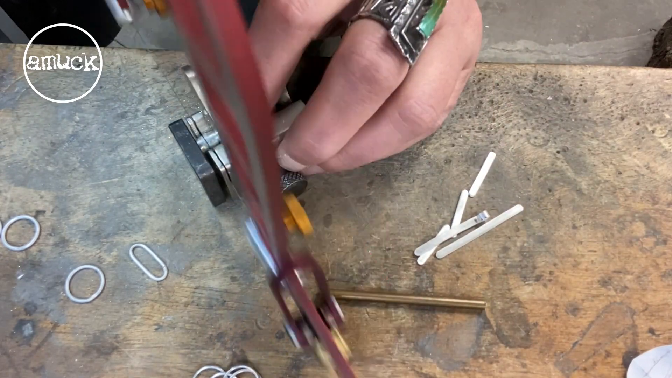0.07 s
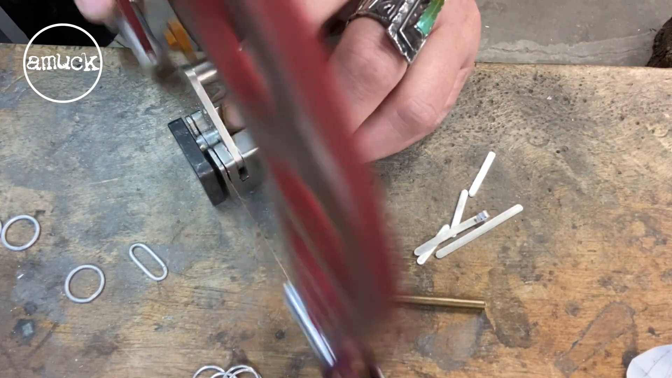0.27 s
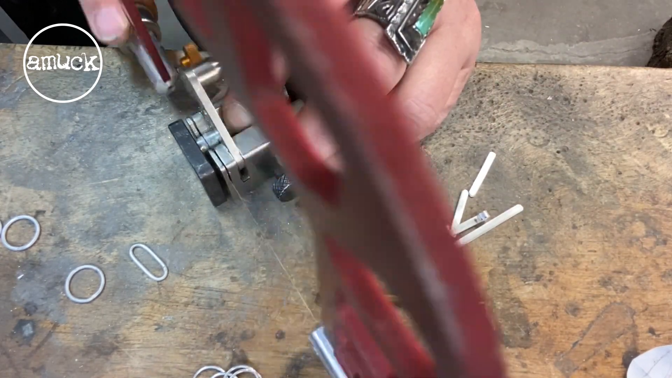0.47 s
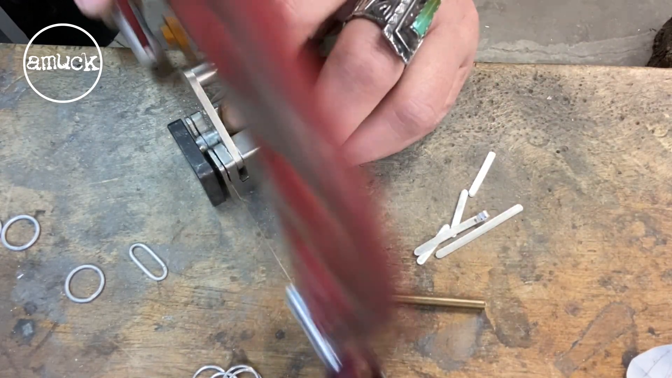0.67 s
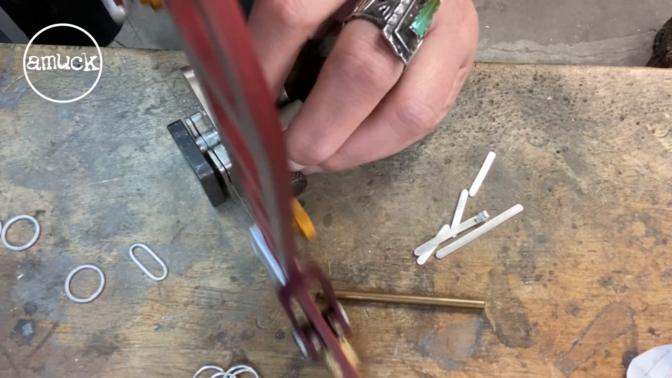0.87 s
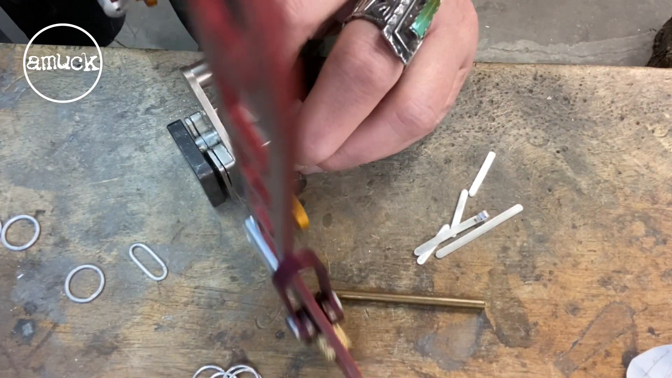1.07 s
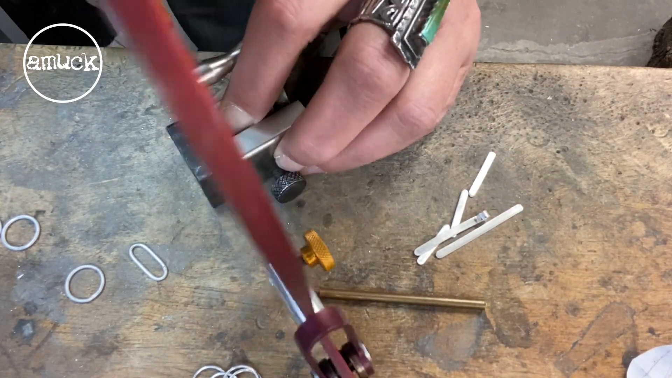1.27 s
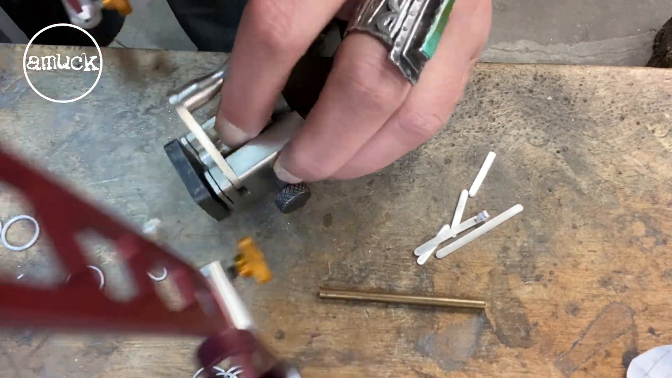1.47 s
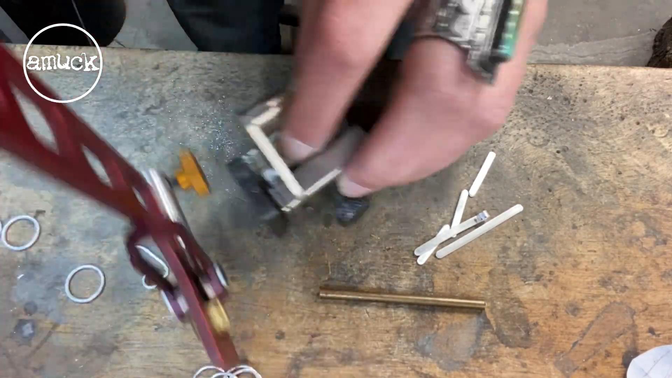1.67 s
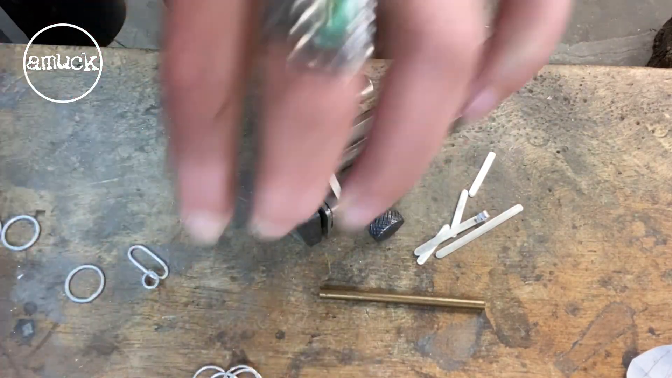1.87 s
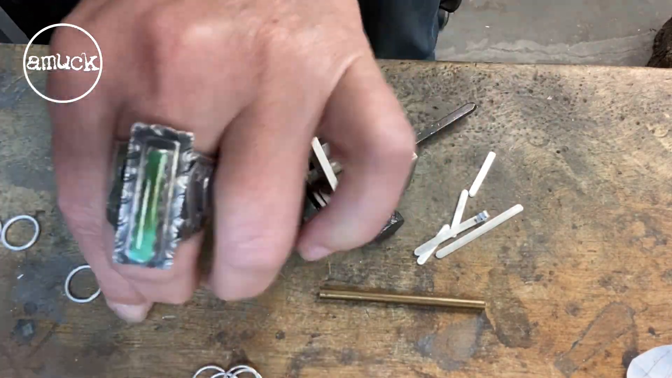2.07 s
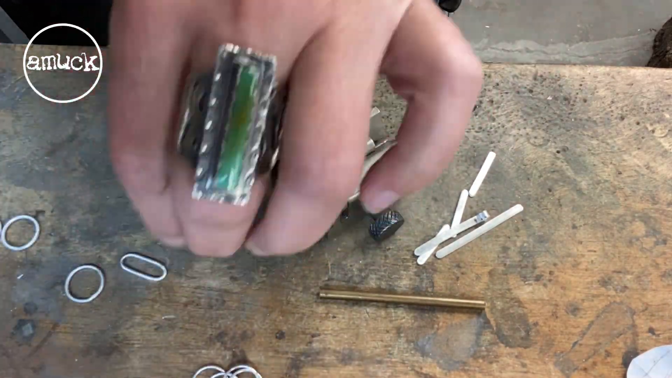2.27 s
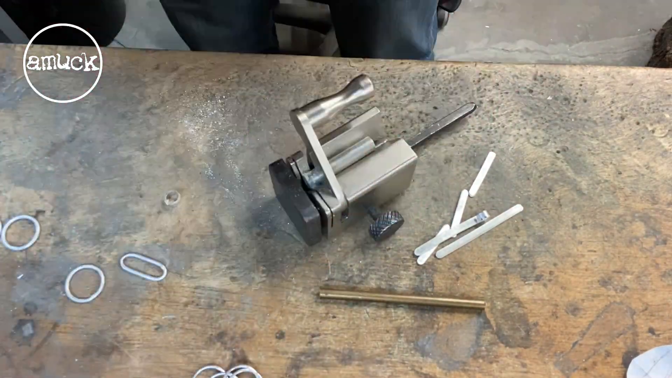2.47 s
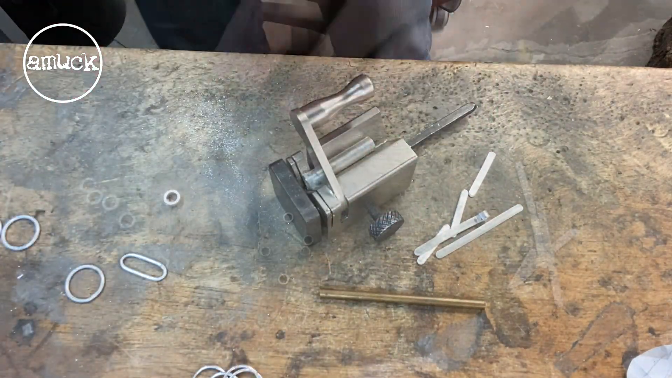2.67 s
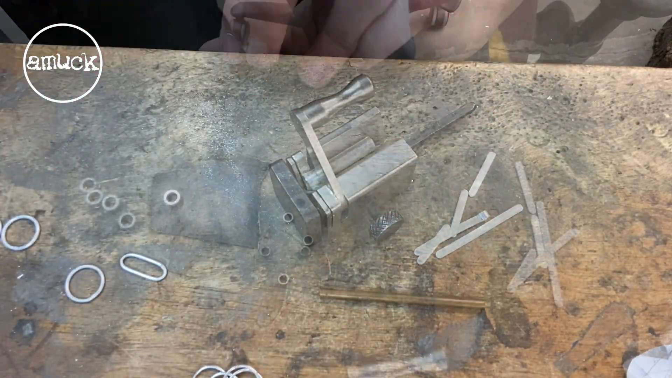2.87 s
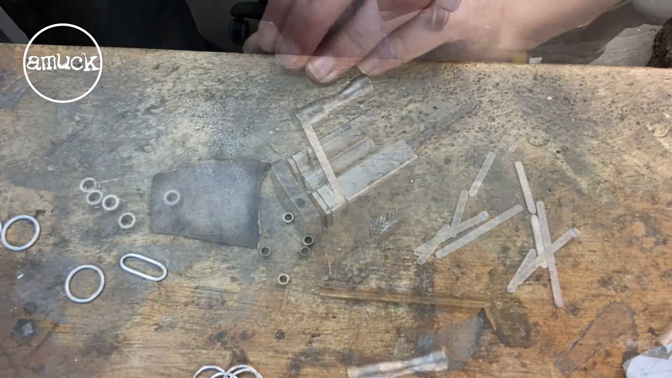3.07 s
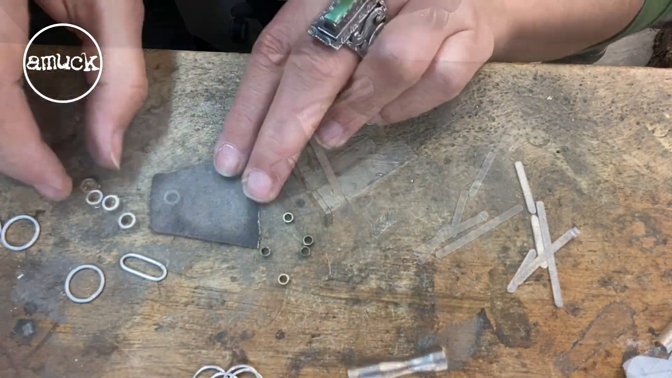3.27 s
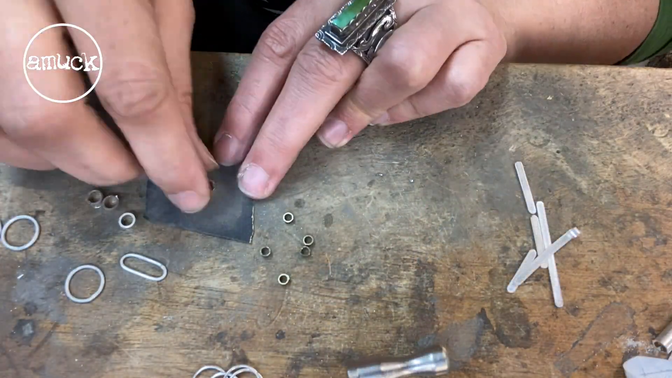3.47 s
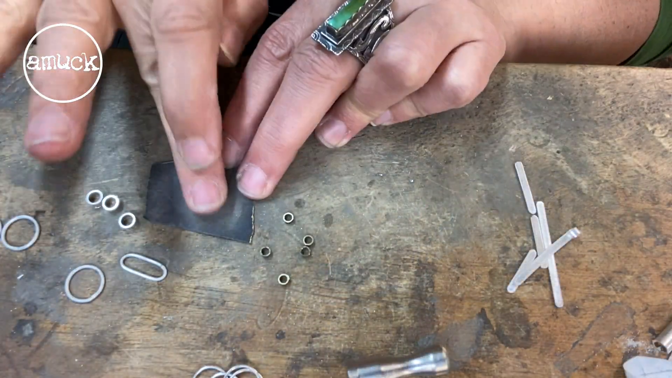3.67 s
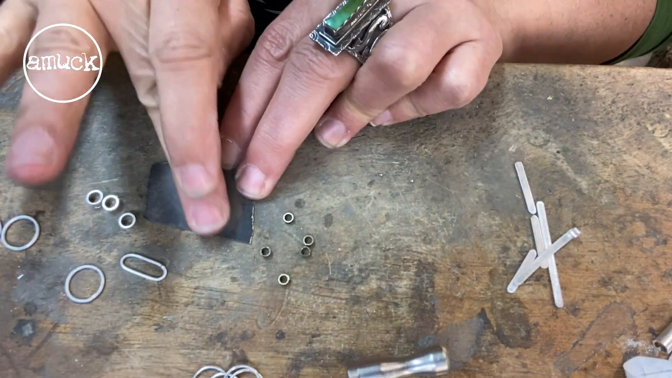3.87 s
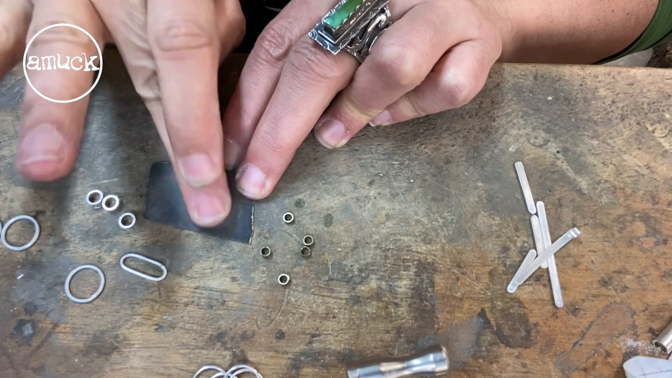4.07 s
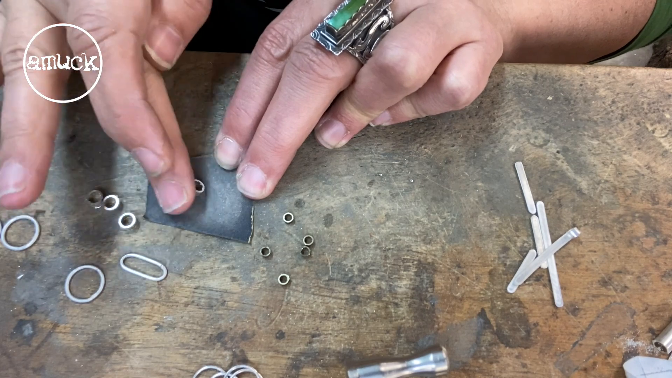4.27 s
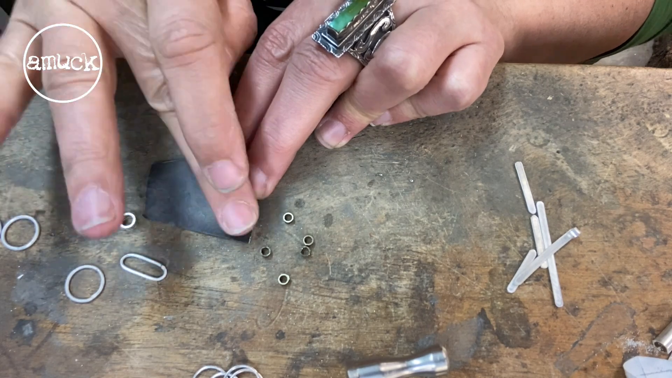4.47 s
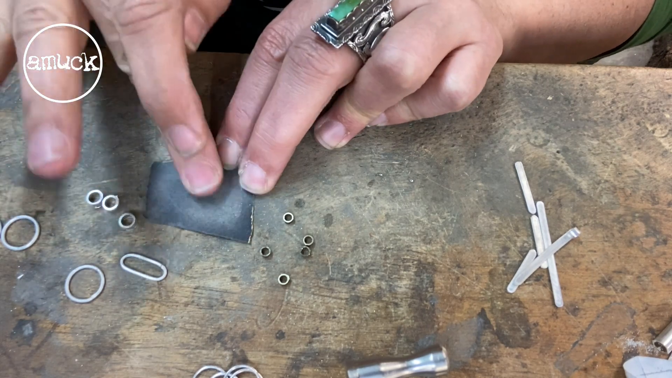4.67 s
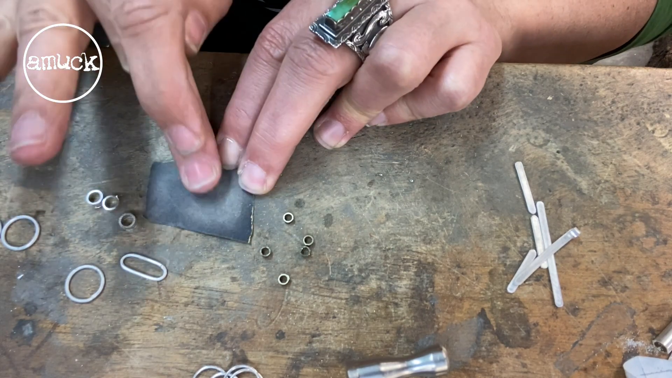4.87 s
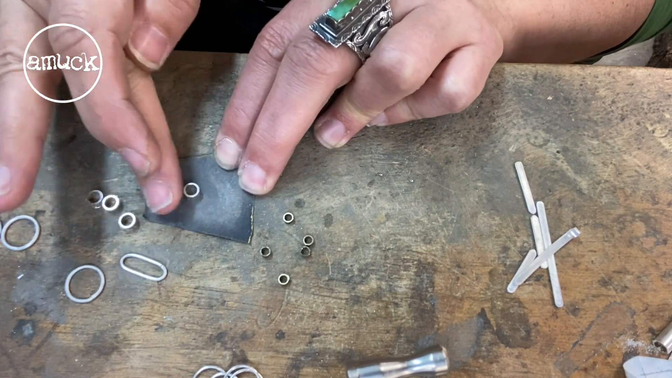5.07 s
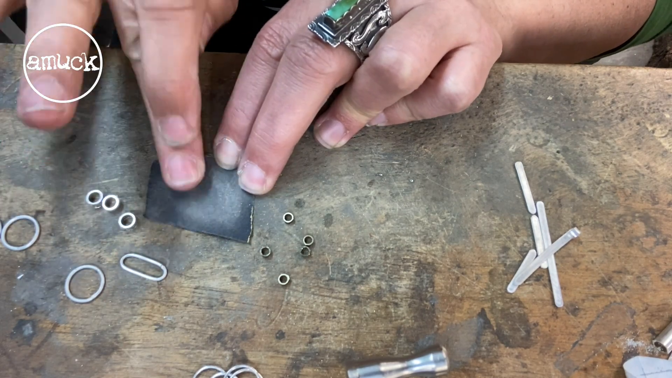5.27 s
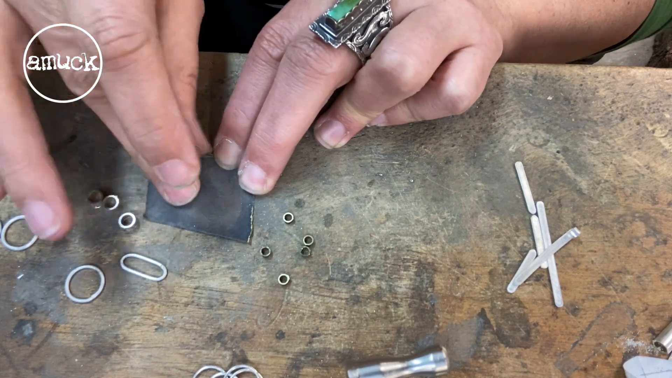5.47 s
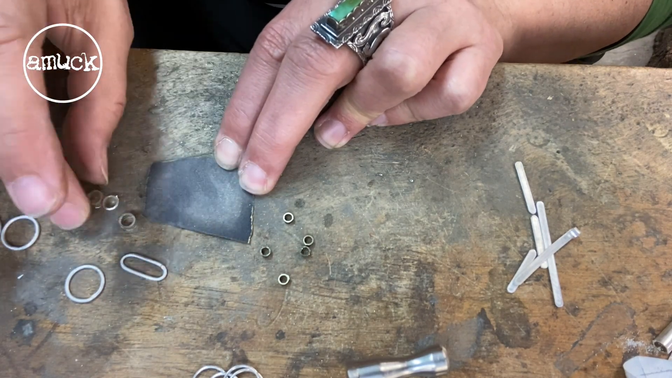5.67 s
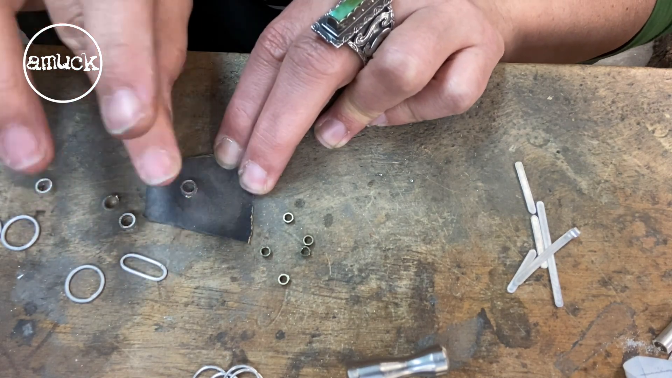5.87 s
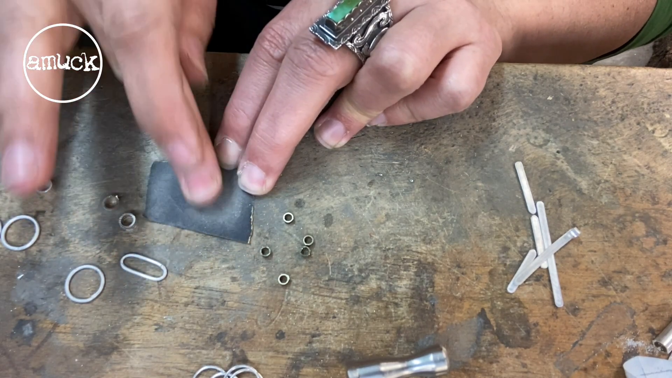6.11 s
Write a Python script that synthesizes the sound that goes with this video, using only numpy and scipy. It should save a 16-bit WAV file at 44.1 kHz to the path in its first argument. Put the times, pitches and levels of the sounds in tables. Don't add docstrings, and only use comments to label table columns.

```python
import sys
import numpy as np
from scipy import signal
from scipy.fft import rfft, irfft, next_fast_len
from scipy.io import wavfile
from scipy.ndimage import map_coordinates

SR = 44100
rng = np.random.default_rng(int(sys.argv[2]) if len(sys.argv) > 2 else 0)


def dump_mix(stems):
    frames = np.atleast_2d(stems).T
    limited = np.clip(frames, -1, 1)
    pcm = np.round(limited * 32767).astype(np.int16)
    wavfile.write(sys.argv[1], SR, pcm)


def decibels_to_gain(level_db):
    exponent = np.asarray(level_db, float) / 20
    return 10 ** exponent


N = 270774
T = np.arange(N) / SR

# centre in [Hz], width in [Hz], level in [dB].
BENCH = [(246, 150, -4.5), (535, 34, 1), (800, 51, -3), (1170, 160, -4.5), (1420, 120, -4.5)]
KNOCK = [(990.6, 220, 2.5), (1330, 250, 2.5), (2000, 640, 9), (3010, 66, -5.5), (4100, 600, -16.5)]
TICK = [(4900, 1100, 1), (5710, 1000, 0), (7530, 530, 2.5), (9900, 760, -8)]
EDGE = [(11720, 6000, 4), (12120, 2200, 0), (16300, 6200, -6.5)]


def unit(x):
    return x / np.sqrt(np.mean(x ** 2) + 1e-20)


def along(points, hz):
    f, v = np.transpose(points)
    return np.interp(np.log(hz + 1), np.log(f + 1), v)


def wobble(rate, size=None):
    knots = rng.standard_normal(int(N * rate / SR) + 4)
    return map_coordinates(knots, [T[:size] * rate])


def filtered(x, response):
    m = next_fast_len(x.shape[-1] + SR // 2)
    spectrum = rfft(x, m) * response(np.fft.rfftfreq(m, 1 / SR))
    return irfft(spectrum, m)[..., :x.shape[-1]]


def early(x, response):
    busy = 3 * SR
    return np.pad(filtered(x[:busy], response), (0, N - busy))


def highpass(corner_hz, order):
    return lambda f: (1j * f / (corner_hz + 1j * f)) ** order


def body(modes, sign=-1):
    grid = np.linspace(0, SR / 2, 8192)
    ring = 0
    for k, (hz, width, db) in enumerate(modes):
        ring = ring + sign ** k * decibels_to_gain(db) * 1j * grid * width / (hz * hz - grid * grid + 1j * grid * width)
    ring = ring / (1 + 1j * grid / (1.4 * modes[-1][0])) ** 3
    ring = ring / np.sqrt(np.mean(abs(ring) ** 2))
    return lambda f: np.interp(f, grid, ring)


def grains(spread_db):
    return unit(rng.standard_normal(N) * decibels_to_gain(spread_db * rng.standard_normal(N)))


def returning(modes, change_db):
    back = [(hz, width, db + change) for (hz, width, db), change in zip(modes, change_db)]
    return modes, back


def saw():
    # start in [s], rasp in [dB], top tooth rate in [Hz],
    # tooth tone in [dB], lateness of top speed [exponent].
    strokes = [(-.04, -48.5, 2000, -54, 0.86), (.042, -44.5, 2304, -57.5, 0.89),
               (0.127, -44, 2235, -41, 0.98), (0.215, -44.5, 2120, -50.5, .9),
               (0.296, -44.5, 2192, -48, 0.98), (.379, -42, 2105, -55, 0.94),
               (.464, -43.5, 2204, -44, 0.99), (.548, -41, 2000, -49.5, 0.93),
               (.632, -42.5, 2112, -43, 0.96), (.727, -41.5, 2209, -54, 0.74),
               (.803, -42.5, 2176, -43, .95), (.885, -41, 2108, -48, 1.04), (0.97, -44, 2000, -49.5, 0.53)]
    # time in [s], flare in [dB].
    flares = [(0.089, 17), (0.137, 16), (.157, 10), (0.19, 5), (.226, 6), (.275, 1), (0.307, 21),
              (.356, 3), (0.389, 9), (.445, 8), (0.48, 13), (.525, 5), (.575, 4), (0.694, 0), (0.74, 11),
              (.812, 19), (.846, 4), (0.9, 6), (.924, 11)]
    # centre in [Hz], width in [Hz], level in [dB].
    jig_modes = [(490, 23, -5.5), (735, 63, -1), (1383, 78, -4), (1550, 39, -3.5), (2060, 99, -4.5),
                 (2571, 160, 0.5), (3630, 170, -6.5), (3796, 88, -6.5)]
    blade_modes = [(4870, 150, -14.5), (5400, 160, -3.5), (5977, 90, -7), (6413, 58, -1), (7310, 160, -0.5),
                   (8200, 400, -13.5), (9300, 150, -11), (10300, 600, -15.5), (11100, 258, -11),
                   (11600, 200, -11), (13200, 70, -8.5), (14200, 77, -1), (14634, 150, -13.5),
                   (15300, 200, -1)]
    jig_return_db = [-3, -2, -3.5, 0.5, -0.5, 2.5, 1.5, -1]
    blade_return_db = [-1, 2.5, -0.5, 2.5, -2.5, -0.5, -1.5, -0.5, -0.5, 0, -4, -0.5, -1, 4.5]
    # frequency in [Hz], level in [dB].
    between = [(60, -34), (150, -23), (300, -16), (1000, -19.5), (3950, -21.5), (4200, -32.5), (9000, -34),
               (16000, -40)]
    overtones_db = [-2, -14]

    s, rasp_db, top_hz, tooth_db, late = np.transpose(strokes)
    last_stroke_s, dwell_s = .064, .001
    length = np.append(np.diff(s), last_stroke_s) - dwell_s
    k = np.clip(np.searchsorted(s, T) - 1, 0, None)
    back = k % 2
    ways = (1 - back, back)

    u = np.clip((T - s[k]) / length[k], 0, 1) ** late[k]
    speed = np.sin(np.pi * u) * (T < 1.002)
    grip = np.where(u < .5, .45, .5)
    bite = np.clip(speed / grip, 0, 1) ** 2.2 * (.75 + .25 * speed)

    pace = np.sin(np.pi * np.clip(u + .06, 0, 1)).clip(0) ** .9
    phase = 2 * np.pi * np.cumsum(top_hz[k] * pace * (1 + .015 * wobble(300))) / SR
    second = decibels_to_gain(overtones_db[0] - 5.8 * speed ** 6) * np.sin(2 * phase)
    third = decibels_to_gain(overtones_db[1]) * np.sin(3 * phase)
    teeth = (np.sin(phase) + second + third) * decibels_to_gain(6 * (u - 1.0))

    flare_s = .004
    flare_db = sum(db * np.exp(-((T[:SR] - at) / flare_s) ** 2) for at, db in flares)
    flare_db = np.pad(flare_db, (0, N - SR))
    snag = decibels_to_gain(1.3 * wobble(109.34) - 2.0 + .45 * flare_db)
    gate = 1 + .6 * np.cos(phase)

    def wood(part, open_db):
        ring = body(part)
        return lambda f: ring(f) + decibels_to_gain(along(between, f) + open_db)

    tone_level = decibels_to_gain(tooth_db[k] + 2 * wobble(120) + .55 * flare_db) / 1.15
    out = early(bite * speed * tone_level * teeth, wood(jig_modes, 19))

    chips = bite * decibels_to_gain(rasp_db[k]) * snag * gate * grains(2)
    for way, part in zip(ways, returning(jig_modes, jig_return_db)):
        out = out + early(way * chips, wood(part, 12))

    clicks = sum(np.sin(h * phase) for h in range(3, 8))
    hiss = gate * grains(2) + .17 * decibels_to_gain(4.5 * wobble(80)) * clicks
    hiss = hiss * bite * speed ** .5 * snag ** .5 * decibels_to_gain(-55.5 + 3 * back)
    for half in (0, 1):
        for way, part in zip(ways, returning(blade_modes, blade_return_db)):
            out = out + early(way * hiss * decibels_to_gain(2.7 * wobble(35) - 2.5), body(part[half::2]))

    glide = 2 * np.pi * np.cumsum(-300 + 8000 * u + 120 * wobble(400)) / SR
    squeak = np.exp(-((u - .76) / .05) ** 2) * decibels_to_gain(-64 + 3 * wobble(60)) * (np.sin(glide) + np.sin(2 * glide))
    turn = 2 * np.pi * np.cumsum(2400 + 5800 * u) / SR
    chirp = np.exp(-((u - .97) / .05) ** 2) * decibels_to_gain(-63) * np.sin(turn) * (T < .9)
    return out + back * (squeak + chirp)


def slide(rows, rise, fall, bodies, sag_db=0):
    gains = np.zeros((len(bodies), N))
    for s, length, db, *rel_db in rows:
        i = slice(round(s * SR), round((s + length + .06) * SR))
        t = T[i] - s
        attack = 1 - np.exp(-(t + 0.00091) / rise)
        release = np.exp(-np.clip(t - 0.77 * length, 0, None) / fall)
        shape = attack * release * decibels_to_gain(sag_db * (.5 - t / length))
        gains[:, i] += decibels_to_gain(db + np.array([0, *rel_db]))[:, None] * shape
    rough = decibels_to_gain(0.56 * wobble(250))
    out = 0
    for gain, modes in zip(gains, bodies):
        out = out + filtered(gain * rough * decibels_to_gain(2.1 * wobble(300)) * grains(5.5), body(modes))
    return out


def rubs():
    # start in [s], length in [s], grit in [dB].
    first_ring = [(3.642, 0.012, -55), (3.678, 0.027, -47), (3.721, 0.019, -50.5), (3.753, 0.015, -46),
                  (3.789, 0.015, -44.5), (3.815, 0.02, -45), (3.846, 0.02, -47.5), (3.876, 0.024, -48),
                  (3.905, 0.026, -47.5), (3.939, 0.027, -48), (3.971, 0.021, -46.5), (4.003, 0.019, -46.5),
                  (4.032, 0.023, -46.5), (4.064, 0.026, -50), (4.098, 0.024, -47), (4.131, 0.023, -50.5),
                  (4.159, 0.022, -51), (4.195, 0.023, -54.5)]
    second_ring = [(4.663, 0.041, -55), (4.707, 0.029, -44), (4.746, 0.022, -50), (4.776, 0.023, -48.5),
                   (4.806, 0.022, -50), (4.838, 0.024, -49), (4.869, 0.0185, -50.5), (4.898, 0.019, -51.5),
                   (4.924, 0.03, -55), (4.959, 0.02, -59.5)]
    third_ring = [(5.197, 0.024, -56), (5.234, 0.021, -50), (5.265, 0.027, -49.5), (5.297, 0.02, -48),
                  (5.326, 0.018, -49.5), (5.356, 0.018, -50.5), (5.381, 0.014, -51), (5.406, 0.015, -51),
                  (5.429, 0.021, -54.5)]
    fourth_ring = [(5.98, 0.029, -51), (6.021, 0.021, -46.5), (6.059, 0.017, -47.5), (6.089, 0.019, -42),
                   (6.12, 0.016, -42)]
    # push chatter, push bench, pull chatter, pull bench, all in [dB].
    grips = [(4, -8.5, -14, -5), (1.5, -8, -6.5, -3.5), (3.5, -10, -14, -5.5), (-2, -15.5, 0, -5)]
    presses_db = [
        [1, 0, 4.5, 0.5, -2.5, 0.5, -6, -2.5, 2, 1.5, -3, -3, -5, 3.5, -5, -0.5, -2, -8],
        [-1.5, 0.5, 2, 0.5, -1, 1.5, -1, 5, 4, -7],
        [-1, -1, -1, -1, -1, -1, -1, -1, -1],
        [5.5, 2.5, 3, -1.5, -7],
    ]
    # centre in [Hz], width in [Hz], level in [dB].
    grit_modes = [(3730, 1820, 0), (5700, 330, 4.5), (7190, 1470, -1), (8260, 620, 2), (9730, 1500, -1),
                  (11600, 470, 7), (12750, 2500, -2), (16100, 1085, 2.5)]
    chatter_modes = [(1831, 200, -1.5), (2676, 500, 9), (2844, 214, 15), (3066, 390, 4.5),
                     (4302, 168.6, -3.5), (4440, 74, -6), (5154, 226, 6.5), (7900, 400, -2)]
    paper_modes = [(498, 108, -6.5), (714, 38, -3.5), (1034, 104, -5.5), (1272.1, 39, -3), (1515.5, 32, -2),
                   (2030, 43, -3.5)]

    rows = []
    for strokes, grip, press_db in zip((first_ring, second_ring, third_ring, fourth_ring), grips, presses_db):
        for k, (s, length, db) in enumerate(strokes):
            chatter_db, bench_db = np.reshape(grip, (2, 2))[k % 2]
            if k in (0, len(strokes) - 1):
                chatter_db = chatter_db - 6
            rows.append((s, length, db, chatter_db, bench_db + press_db[k]))
    rubbed = slide(rows, 0.0031, 0.0042, (grit_modes, chatter_modes, paper_modes), sag_db=2.5)
    return filtered(rubbed, highpass(300, 3))


def hits():
    # time in [s], thud, knock, tick and edge in [dB].
    blows = [(1.0029, -39, -8.5, -15.5, -33), (1.040, -55, -45.5, -47, -32), (1.107, -52, -45, -44, -34),
             (1.1787, -43.5, -38.5, -31.5, -36), (1.452, -85, -42, -28.5, -29),
             (1.4751, -48.5, -37.5, -44, -62), (1.4791, -47.5, -30, -64, -63), (1.4836, -69, -49, -46, -35),
             (1.488, -47.5, -62, -36, -48), (1.5047, -60, -58, -40.5, -37.5),
             (1.7211, -54, -56, -58, -45.5), (2.0727, -77, -50, -43, -42), (2.337, -69, -60, -42, -38.5),
             (2.4271, -76.5, -87.5, -68, -41.5)]
    # time in [s], tick in [dB], weight in [dB].
    faint = [(1.0825, -52, -11), (1.1043, -51, -2), (1.3708, -60.5, -5.5), (1.514, -49, -2),
             (1.529, -52.5, -16), (1.534, -59, -1.5), (1.9512, -69, 26), (2.048, -60.5, 6),
             (2.1546, -54.5, -5), (2.315, -54.5, 7), (2.327, -56.5, 9.5), (2.352, -53.5, -13.5),
             (3.37, -67.5, 10), (3.472, -54, -12.5), (3.601, -71, 0), (3.6346, -63, 1.5), (3.64, -51, -7),
             (4.3401, -67, 2.5), (4.36, -63.5, -3), (4.376, -72, 10), (4.3919, -66.5, 5),
             (4.6531, -60.5, -5), (4.9906, -58, -9), (5.02, -65.5, -6), (5.084, -63.5, -2),
             (5.1759, -65, 3), (5.627, -54, -18), (5.7172, -63.5, -3), (5.851, -57.5, -1)]
    # level in [dB], and [dB] per dB of weight.
    tick_db = [-16.5, -8, 2, -1]
    tick_per_weight = [1, 0.54, -0.11, -0.18]
    # thud, knock, tick and edge in [dB].
    tail_db = [-17, -21, -28, -41]

    rattle_t60, tail_t60 = .011, .09
    pushes, t = np.zeros((4, N + SR)), np.arange(SR // 8) / SR
    ticks = [(s, *(db + np.array(tick_db) + np.multiply(tick_per_weight, weight))) for s, db, weight in faint]
    decay = decibels_to_gain(-60 * t / rattle_t60 / [[2.2], [1.2], [1], [.8]])
    decay = decay + decibels_to_gain(np.c_[tail_db] - 60 * t / tail_t60)
    for s, *levels_db in blows + ticks:
        push = rng.standard_normal((4, len(t))) * decay
        push[:, :3] += [[4], [-4], [2.5], [1.5]]
        level = decibels_to_gain(np.add(levels_db, [5.7, 0.69, 0.64, 0.77]))
        pushes[:, round(s * SR):][:, :len(t)] += level[:, None] * push
    return sum(filtered(p[:N], body(b)) for p, b in zip(pushes, (BENCH, KNOCK, TICK, EDGE)))


def landings():
    # centre in [Hz], width in [Hz], level in [dB].
    drop_modes = [(260, 120, -4), (720, 300, -1), (1250, 500, 2), (1900, 600, 1), (2850, 200, -13),
                  (4500, 450, -6), (5150, 600, -5), (6100, 500, -12), (7800, 700, -12), (9600, 400, -7),
                  (11200, 900, -17)]
    rest_modes = [(278, 60, 2.5), (513.3, 50, 4), (780, 130, -1), (1198, 370, -3.5), (1800, 420, -3),
                  (2400, 210, -6.5), (2954, 250, -9), (3550, 450, -8), (4680, 270, -15), (5200, 300, -15),
                  (7500, 660, -25), (9000, 700, -26)]
    snap_modes = [(267, 120, -15), (537, 29, -14), (764, 90, -10.5), (990, 140, -4), (1306, 120, -2),
                  (1995, 430, 1.5), (2773, 170, -10.5), (3329, 300, -18.5), (4270, 400, -9.5),
                  (5350, 530, -12.5), (7400, 900, -11.5), (9490, 780, -18)]
    # time in [s], level in [dB], contact in [ms].
    drop_hits = [
        (1.1793, -24, .07),
        (1.215, -56, .07),
    ]
    rest_hits = [(1.6917, -35.5, 0.33), (1.698, -41, 0.46), (1.7124, -20, 0.073), (1.7166, -32, 0.34),
                 (1.7199, -23.5, .2), (1.7243, -31.5, .6), (1.732, -35, 0.57), (1.740, -37, .7),
                 (1.751, -39.5, 0.64), (1.76, -47, 0.55), (1.952, -49, .9), (2.085, -69, .25),
                 (2.316, -51, .9)]
    snap_hits = [
        (1.0025, -10, 0.089),
        (1.003, -16.5, 0.13),
        (1.0088, -27, 0.25),
        (1.0402, -33, .1),
    ]

    out, t = 0, np.arange(SR // 8) / SR
    kinds = ((drop_modes, drop_hits, -1), (rest_modes, rest_hits, 1), (snap_modes, snap_hits, 1))
    for modes, rows, sign in kinds:
        push, ring = np.zeros(N + SR), body(modes, sign=sign)
        for s, db, contact_ms in rows:
            rattle = rng.standard_normal(len(t)) * (.3 * decibels_to_gain(-60 * t / .03) + decibels_to_gain(-21 - 60 * t / .12))
            rattle[0] -= 18
            contact = np.exp(-(t[:90] * 1000 / max(contact_ms, .03) - 1) ** 2 * 4)
            softened = np.convolve(rattle, contact / contact.sum())[:len(t)]
            push[round(s * SR):][:len(t)] += decibels_to_gain(db) * softened
        thin = highpass(140, 2)
        out = out + early(push, lambda f: ring(f) * thin(f))
    return out


def frame():
    # pitch in [Hz], level in [dB], t60 in [s].
    spine = [(6487, -3, .13), (7500, -4, .025), (11400, -9, .05), (12110, 0, .33), (12370, -1, .33),
             (14900, 2, .04)]
    arm = [(3150, -4, .1), (4795, -5, .6), (6175, -2, .6), (7825, 4, .05), (9512, -8, .09), (10170, -6, .4),
           (11190, 3, .35), (12900, -6, .4), (13870, -8, .1), (14700, -8, .4)]
    screw = [(8350, 0, .045)]
    # time in [s], level in [dB], rise in [s], pitch over rest [ratio],
    # share of its ringing time [ratio].
    spine_touches = [(1.084, -62, .006, 1, 1.3), (1.356, -66, .004, 1, 1.4), (1.398, -65, .001, 1, 1.1)]
    arm_touches = [(1.047, -64, .004, 1, .2), (1.398, -64, .015, 1, 1.3)]
    screw_touches = [
        (.9965, -17, .003, 1.013, .45),
        (1.107, -27, .003, 1.013, .45),
        (1.126, -57, .004, 1.013, .5),
        (1.399, -35, .008, .993, 1.1),
    ]

    buzz_db = 3.5
    out, t = 0, np.arange(SR // 2) / SR
    for modes, touches in ((spine, spine_touches), (arm, arm_touches), (screw, screw_touches)):
        part = np.zeros(N + SR)
        for s, db, rise, pitch, share in touches:
            ring = 0
            for hz, level, t60 in modes:
                level_db = level - 60 * t / (share * t60) + buzz_db * wobble(70, size=len(t))
                ring = ring + decibels_to_gain(level_db) * np.sin(2 * np.pi * pitch * hz * t)
            part[round(s * SR):][:len(t)] = decibels_to_gain(db + 8.0) * ring * (1 - np.exp(-t / rise))
        out = out + part[:N]
    return out * decibels_to_gain(2 * wobble(40))


def low_thump():
    thump_db = [-23, -30]
    start_s, length_s = 1.0028, .0025
    return decibels_to_gain(np.c_[thump_db]) * np.sin(np.pi * np.clip((T - start_s) / length_s, 0, 1))


def scuffs():
    # start in [s], length in [s], grit in [dB], weight in [dB].
    drags = [(0.992, 0.0072, -48, 12), (0.9956, 0.015, -29.5, -4.5), (1.014, 0.027, -43.5, 2),
             (1.039, 0.009, -42, -7), (1.356, 0.0084, -63, -9.5), (1.394, 0.02, -70.5, 4.5),
             (1.583, 0.035, -70.5, 5), (1.61, 0.075, -59, 5), (1.664, 0.096, -62, 11.5),
             (1.949, 0.02, -61.5, 1), (1.976, 0.016, -65.5, 4), (2.012, 0.029, -65.5, -1),
             (2.065, .0051, -55, -8.5), (2.073, 0.037, -61, 1), (2.155, 0.0063, -58, -3.5),
             (2.339, 0.028, -59.5, -7), (2.625, 0.2, -72.5, -3), (3.213, 0.016, -74.5, 6),
             (3.308, 0.029, -73.5, -12.5), (3.417, 0.02, -69.5, -20.5), (4.303, 0.011, -57.5, -13),
             (4.32, 0.011, -71.5, -14), (4.482, 0.0074, -65.5, -11), (4.547, 0.01, -63, -6.5),
             (5.507, 0.0068, -67.5, -13.5), (5.628, .008, -67, -14.5), (5.797, 0.0055, -56.5, -8),
             (5.852, .01, -74, -2), (5.927, 0.0056, -57.5, -12.5)]
    # level in [dB], and [dB] per dB of weight; heavy things lose edge.
    scuff_db = [0, 0, -2.5, -10.5]
    per_weight = [0, .95, 1.8, -1]
    rows = []
    for s, length, db, weight in drags:
        answers_db = np.array(scuff_db) + np.multiply(per_weight, weight)
        rows.append((s, length, db, *answers_db[1:]))
    return slide(rows, .003, .0045, (TICK, KNOCK, BENCH, EDGE))


def shop(x):
    # frequency in [Hz], t60 in [s].
    decay_s = [(150, .3), (1000, .05), (4000, .084), (12000, .025)]
    hz, t, z = signal.stft(rng.standard_normal((2, SR // 3)), SR, nperseg=256)
    tail = signal.istft(z * decibels_to_gain(-60 * t / along(decay_s, hz)[:, None]), SR, nperseg=256)[1]
    delayed = np.pad(x, (130, 0))[None]
    return signal.fftconvolve(delayed, tail / np.linalg.norm(tail[0]), axes=1)[:, :N]


def air():
    # frequency in [Hz], level in [dB per Hz].
    rumble = [(20, -53), (60, -24.5), (100, -6.5), (170, -3), (260, 1.5), (380, -6.5), (600, -62.5)]
    hum = [(100, -51), (170, -23), (240, -6), (450, -0.5), (800, -5), (1500, -10), (3000, -17.5),
           (6000, -61)]
    hiss = [(500, -63), (1500, -4.5), (3000, 0), (8000, -4), (16000, -8)]
    # frequency in [Hz], likeness [correlation].
    alike = [(100, .97), (300, .82), (1400, .66), (3100, .85), (7000, .96), (15000, .94)]
    # time in [s],
    # level in [dB].
    stir = [(0, 11.5), (.95, 13), (1.2, -7), (1.6, 1), (1.8, -4.5), (2.65, -5), (2.9, -7.5), (3.3, -5.5),
            (3.9, -2.5), (4.3, -5.5)]
    rumble_course = [(0, 0), (1, -3.5), (1.15, 0.5), (2.3, -6), (2.6, -5.5), (2.9, -12), (3.15, -10.5), (3.3, -22.5)]
    # level in [dB], and [dB] per dB of stir.
    air_db = [-66.5, -65.5, -69.5]
    per_stir = [0.2, 0.94, 0.44]

    stir_db = np.interp(T, *np.transpose(stir))
    rumble_course_db = np.interp(T, *np.transpose(rumble_course))
    out = 0
    for db, share, fade_db, colour in zip(air_db, per_stir, (rumble_course_db, 0, 0), (rumble, hum, hiss)):
        def spread(hz):
            turn = np.arccos(np.clip(along(alike, hz), -1, 1)) / 2
            return decibels_to_gain(along(colour, hz)) * [np.cos(turn), np.sin(turn)]
        mid, side = filtered(rng.standard_normal((2, N)), spread)
        level = decibels_to_gain(db + share * stir_db + fade_db + 1.2 * wobble(11))
        out = out + level * unit(np.array([mid + side, mid - side]))
    return out


def scene():
    # frequency in [Hz], level in [dB]; then frequency in [Hz], lead in [rad].
    ports_db = [(400, 1.8), (1000, 1.3), (2200, .5), (4200, 1), (9000, 1)]
    ports_rad = [(400, 0.12), (1200, 0)]
    # time in [s], level in [dB].
    lean = [(0, -.8), (.95, -.8), (1.0, .4), (1.2, 0), (1.45, .5), (1.7, .2), (2.3, 1), (3.4, 0)]
    # frequency in [Hz], level in [dB].
    wet = [(400, -12), (2500, -29.5), (12000, -17)]
    beside = [(300, -20), (1000, -26.5), (3000, -32.5), (8000, -24.5), (15000, -18)]
    paper_wide = [(400, -3), (1000, 9), (2200, 6), (4500, 5), (10000, 1)]

    paper = rubs()
    near = saw() + paper + hits() + landings() + frame() + scuffs()
    near = filtered(near, highpass(130, 2))
    half = np.array([[.5], [-.5]])
    direct = filtered(near, lambda f: decibels_to_gain(half * along(ports_db, f)) * np.exp(1j * half * along(ports_rad, f)))

    echo = rng.standard_normal(1200) * decibels_to_gain(-.03 * np.arange(1200))
    wide = near + filtered(paper, lambda f: decibels_to_gain(along(paper_wide, f)))
    echoes = signal.fftconvolve(wide, echo / np.linalg.norm(echo))[:N]
    direct = direct + 2 * half * filtered(echoes, lambda f: decibels_to_gain(along(beside, f) - 2.5))

    direct = direct * decibels_to_gain(half * np.interp(T, *np.transpose(lean)))
    room = filtered(shop(near), lambda f: decibels_to_gain(along(wet, f)))
    return direct + room + low_thump() + air()


def low_pass(x):
    return signal.sosfilt(signal.butter(12, 16660, fs=SR, output="sos"), x)


def record(dry):
    clipped = dry / (1 + abs(dry) ** 6) ** (1 / 6)
    mix = filtered(clipped, lambda hz: decibels_to_gain(-45 * np.clip((hz - 15740) / 160, 0, 2)))
    return low_pass(mix)


dry = scene()
out = record(dry)
dump_mix(out)
```